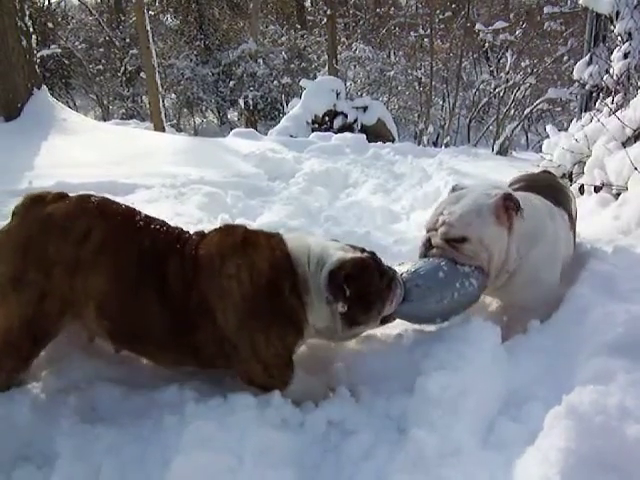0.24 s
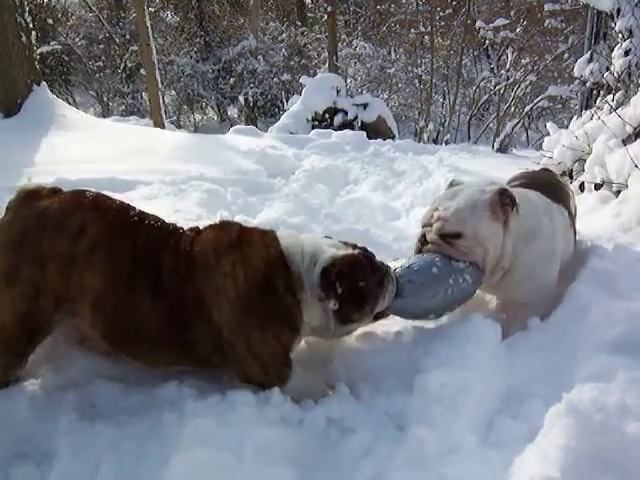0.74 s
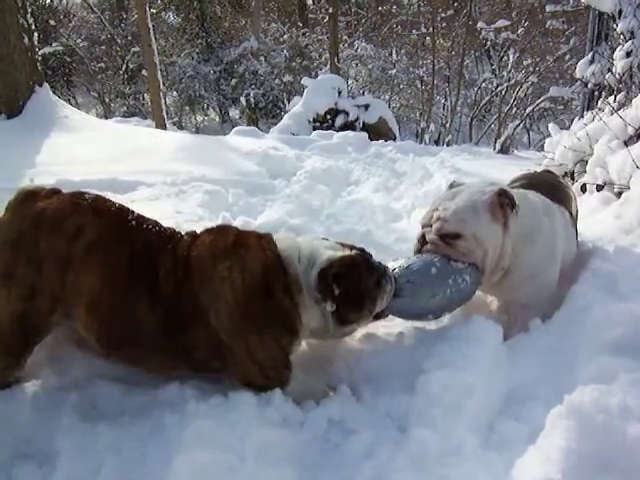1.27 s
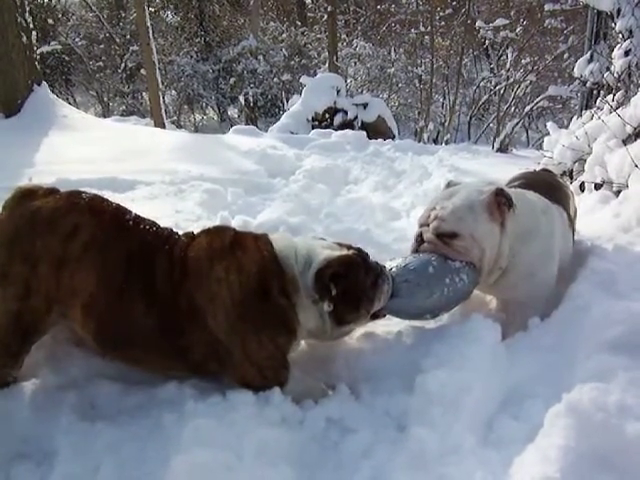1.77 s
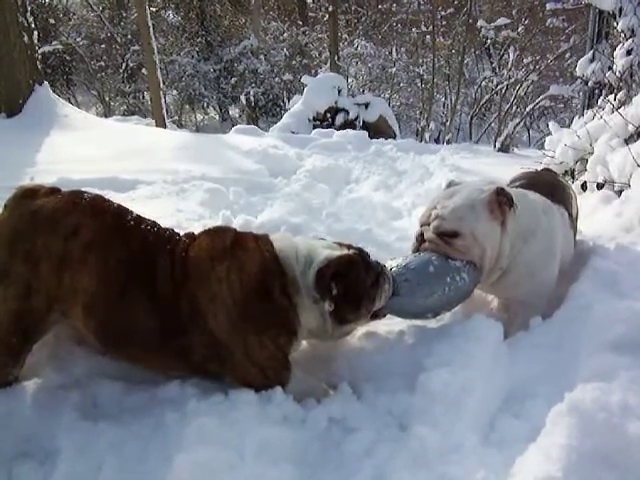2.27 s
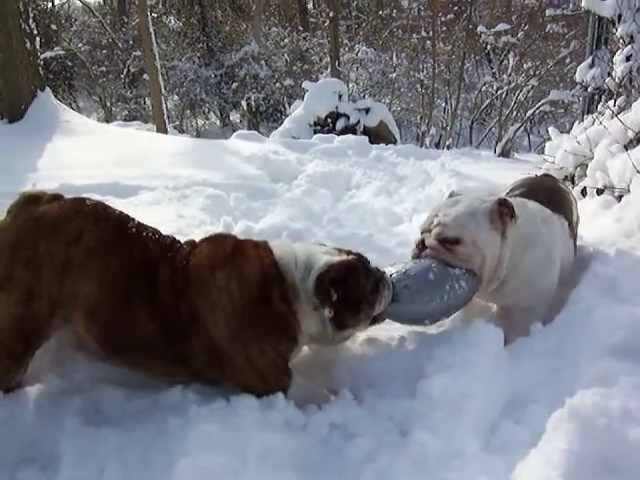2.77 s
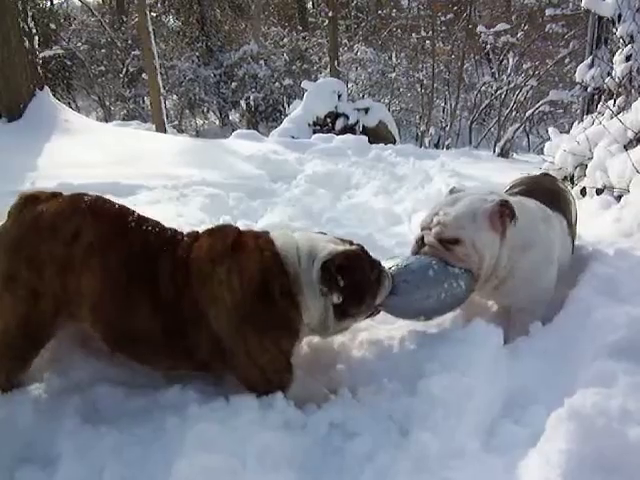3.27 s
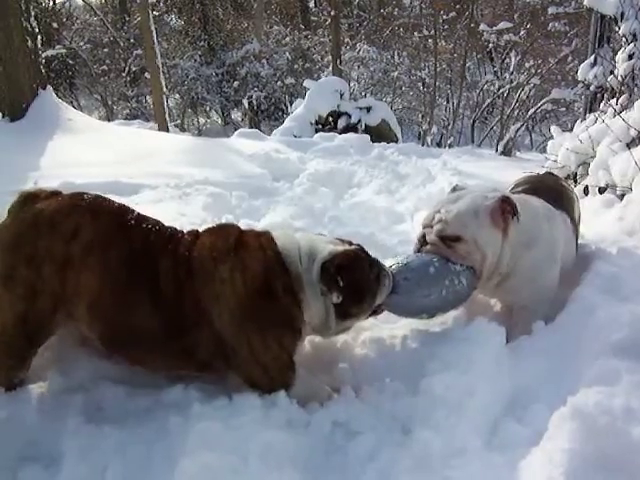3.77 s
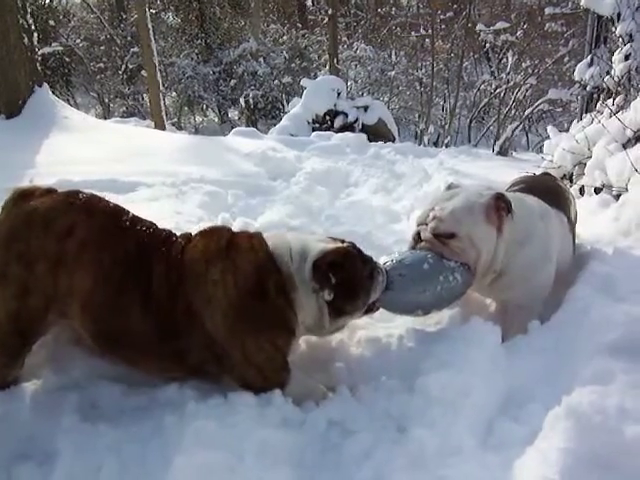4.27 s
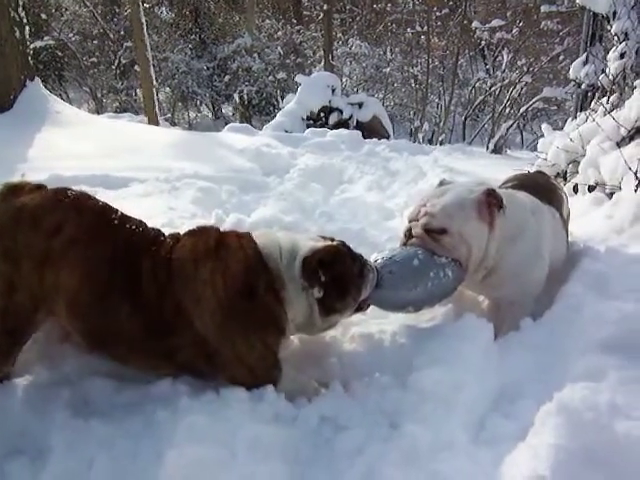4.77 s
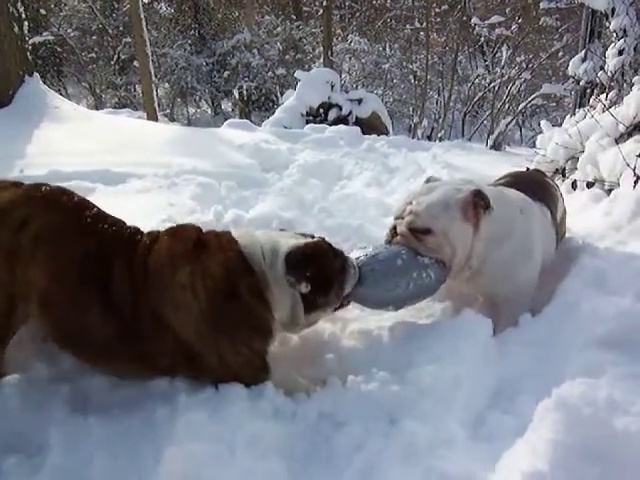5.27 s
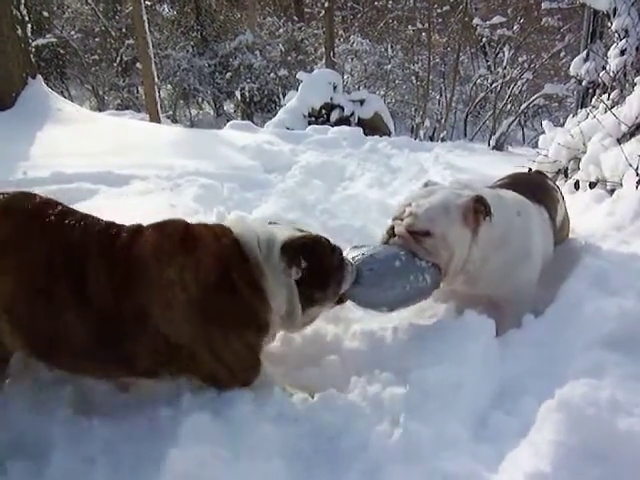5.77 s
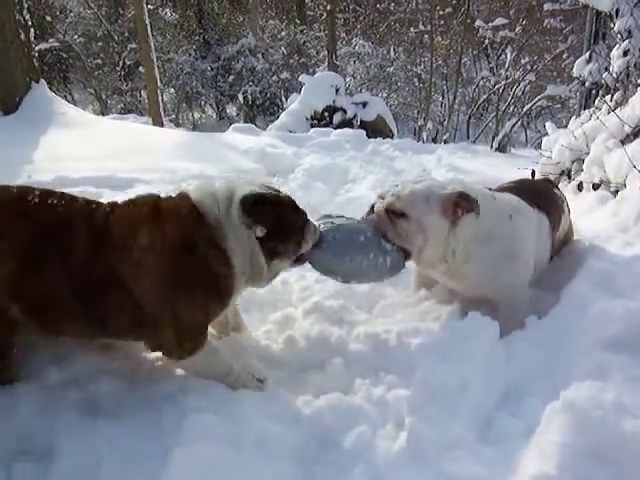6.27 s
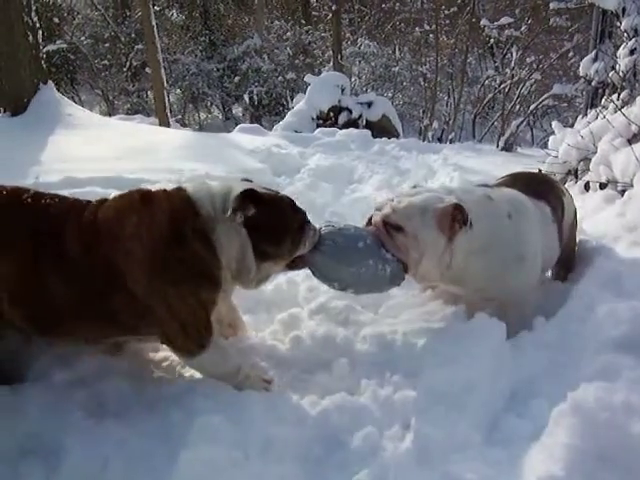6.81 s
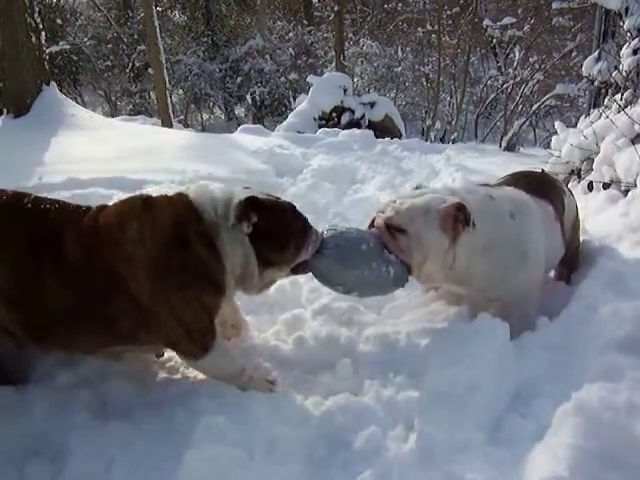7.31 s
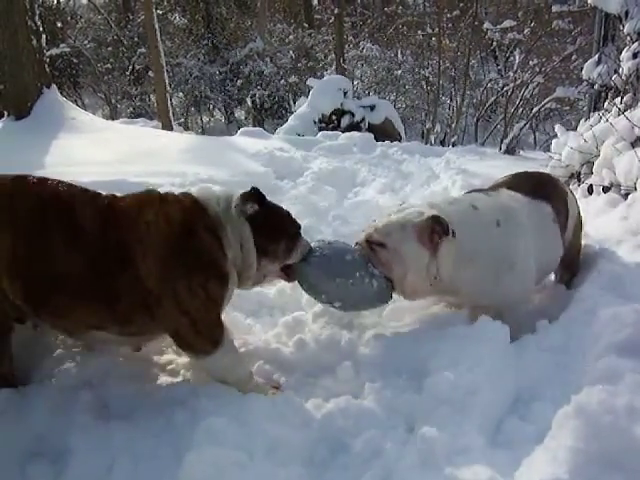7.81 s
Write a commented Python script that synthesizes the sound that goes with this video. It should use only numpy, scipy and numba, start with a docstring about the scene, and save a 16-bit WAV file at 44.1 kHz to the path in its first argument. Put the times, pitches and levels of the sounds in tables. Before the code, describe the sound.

Two short-nosed dogs tug with mouths full, their throaty growls fluttering about twenty times a second. The deep one builds to a hard bark, the background thins, and the higher one answers with a weak whine. Another deep growl breaks into a slightly softer bark, followed by higher, agitated growling, snorts and tooth knocks. Wind buffets a small, muffled microphone in an open snowy place with almost no echo.

```python
"""Two short-nosed dogs growl through clenched jaws as they tug a ball in deep snow, with two barks and a few snorts.
Each growl is a rough low voice chopped by a flapping soft palate and coloured by throat, mouth and nose.
Barks and snorts are fast uneven pulses through open jaws; a whine and nostril wheezes ride along.
Teeth click on the ball, a bird chirps, and wind rumbles and thumps on the microphone over a soft hiss."""
import sys
import numpy as np
from scipy import signal
from scipy.fft import rfft, irfft, next_fast_len
from scipy.io import wavfile
from scipy.ndimage import uniform_filter1d
from numba import njit

SR = 44100
rng = np.random.default_rng(int(sys.argv[2]) if len(sys.argv) > 2 else 0)


def store_pcm(level_fs):
    """Save levels as 16-bit WAV."""
    pcm = np.round(np.clip(level_fs, -1, 1) * 32767).astype(np.int16)
    wavfile.write(sys.argv[1], SR, np.atleast_2d(pcm).T)


N = 355001


def deep_dog(flap_db):
    """Long growls of the deep-voiced dog, its airway a set of throat, mouth and nose resonances."""
    # One list for each growl. Each row: time in seconds, pitch in Hz, effort in dB,
    # rasp over the effort in dB, mouth resonance in Hz.
    phrases = [
        [(0.0, 123.2, -37, -3, 1877), (0.05, 120.5, -40, -5.5, 1760), (0.14, 102.6, -38.5, 4, 1940),
         (0.315, 95.4, -41.5, 9, 2040), (0.335, 93.3, -44.5, 0, 2060), (0.38, 92.8, -50, 2.5, 2050),
         (0.4, 92.7, -62, -12, 2020), (0.55, 90.1, -57, -7, 1910)],
        [(1.04, 120, -56.5, -2.5, 1874), (1.23, 148.9, -53.5, -10.5, 1860), (1.52, 156.2, -48.5, -8, 2020),
         (1.71, 132.1, -45.5, -7.5, 2130), (1.95, 127.1, -44, -8, 2173), (2.28, 119, -37.5, -7.5, 1794),
         (2.69, 127.1, -34.5, -8.5, 1866), (2.845, 167.6, -27, -9.5, 1850)],
        [(3.74, 133, -62.5, -4, 1687), (3.85, 123, -55, -7.5, 1716), (4.13, 114.1, -54.5, -4, 1750),
         (4.62, 114.4, -46.5, -1, 2007), (4.74, 142.5, -43, -13, 2026), (4.815, 156, -43.5, -2, 1904)],
        [(7.27, 121.8, -60, -15, 1860), (7.49, 132.7, -50, -1.5, 1820), (7.6, 132.6, -52, 2, 1770),
         (7.71, 133, -44.5, -8.5, 1697), (7.79, 129.1, -45.5, 1, 1581), (7.96, 192.3, -44.5, 3, 1340),
         (8.05, 204.5, -40, 0.5, 1670)],
    ]
    # Body of each growl at mean effort. Each row: chest tone in dB, nose hiss in dB.
    placing = [(-36.5, -46.5), (-35, -48), (-42, -48.5), (-39, -47.5)]
    # Fixed throat resonances. Each row: centre in Hz, width in Hz, level in dB.
    throat = [(506, 292, 13.5), (912, 140, 7), (1056, 93, 12)]
    # Mouth resonances that move. Each row: centre as a multiple of the mouth Hz, width in Hz, level in dB.
    mouth = [(1.02, 233, 6.5), (0.93, 580, 2), (1.299, 97.8, 0.92)]
    # Fixed nose resonances. Each row: centre in Hz, width in Hz, level in dB.
    nose = [(3160, 700, -4.5), (3905, 310, -5), (5140, 2100, -13.5), (5860, 470, -5.5), (6840, 7200, -9)]
    return growl(phrases, placing, throat, mouth, nose, flap_db,
                 chest_law=(0.72, .3, -37.5), hiss_law=(0.87, 0.92, -20),
                 jitter=.08, breath=0.85, rattle=1.24, overtone=0.11)


def higher_dog(flap_db):
    """Growls of the higher-voiced dog: a steadier, less breathy voice with more rattle and octave in the chest."""
    # One list for each growl. Each row: time in seconds, pitch in Hz, effort in dB,
    # rasp over the effort in dB, mouth resonance in Hz.
    phrases = [
        [(3.01, 170.3, -45, -10, 2000), (3.31, 191.6, -54.5, -8, 2080), (3.44, 169.4, -54.5, -10.5, 2170),
         (3.57, 177, -59.5, -4, 2357)],
        [(5.02, 170.5, -61.5, -10, 2000), (5.16, 161.6, -55, -4.5, 1920), (5.34, 147, -61.5, -7.5, 2300),
         (5.52, 174.4, -54, -9.5, 2402), (5.72, 173, -59, -4.5, 2495), (5.8, 167.5, -52, -5, 2000),
         (5.92, 163.7, -47, -10.5, 1772), (6.04, 185.4, -51, -3.5, 2300)],
        [(6.06, 214.9, -54, -2, 2120), (6.13, 232.2, -46.5, -7.5, 2140), (6.28, 199.4, -49, -7.5, 2312),
         (6.43, 268.7, -40.5, -10, 1950), (6.46, 191.7, -39.5, -8.5, 1980), (6.56, 186, -42, 2, 2020),
         (6.68, 191.3, -50.5, -9, 2250), (6.75, 205, -59.5, 3.5, 2230)],
    ]
    # Body of each growl at mean effort. Each row: chest tone in dB, nose hiss in dB.
    placing = [(-49, -48.5), (-45.5, -49.5), (-44.5, -50)]
    # Fixed throat resonances. Each row: centre in Hz, width in Hz, level in dB.
    throat = [(496, 196, 7.8), (978, 286, 3.9)]
    # Mouth resonances that move. Each row: centre as a multiple of the mouth Hz, width in Hz, level in dB.
    mouth = [(.82, 405, -5), (1, 363, 5.5), (1.2, 350, -7)]
    # Fixed nose resonances. Each row: centre in Hz, width in Hz, level in dB.
    nose = [(3590, 760, 1), (4950, 200, -9), (6050, 1630, -5)]
    return growl(phrases, placing, throat, mouth, nose, flap_db,
                 chest_law=(0.4, 0.086, -35), hiss_law=(0.8, 0.75, -20),
                 jitter=.05, breath=0.75, rattle=1.7, overtone=0.31)


def growl(phrases, placing, throat, mouth, nose, flap_db, chest_law, hiss_law, jitter, breath, rattle, overtone):
    """Chest tone, then throat, mouth and nose resonances of a breathy voice chopped by the palate."""
    spans = [[(*row, *pair) for row in rows] for rows, pair in zip(phrases, placing)]
    gate, hz, effort_db, rasp_db, mouth_hz, chest_mean_db, nose_mean_db = in_time(spans)
    chest_db = follow_effort(chest_mean_db, effort_db, rasp_db, *chest_law)
    nose_db = follow_effort(nose_mean_db, effort_db, rasp_db, *hiss_law)

    phase, source = glottis(hz, jitter, shimmer_db=5.5, breath=breath)
    chopped = source * from_db(flap_db)
    gusts = from_db(1.4 * flap_db + 1.5 * drift(9))
    airy = (source + 0.38 * rng.standard_normal(N)) * gusts   # turbulence in the nose

    tone = np.sin(2 * np.pi * phase) + overtone * np.sin(4 * np.pi * phase)
    hum = rms_one(tone * from_db(.4 * flap_db + 2.5 * drift(40)))
    rattling = rms_one(moving_resonance(chopped, 0.74 * hz, width_hz=78.7))   # just below the pitch
    chest = rms_one(hum + rattle * rattling)

    clenched = chopped * from_db(0.2 * flap_db)   # the mouth is chopped a little deeper
    jaws = rms_one(sum(from_db(level_db) * moving_resonance(clenched, ratio * mouth_hz, width_hz)
                       for ratio, width_hz, level_db in mouth))
    voice = from_db(chest_db) * chest + from_db(effort_db) * resonances(chopped, throat)
    voice = voice + from_db(effort_db + rasp_db) * jaws
    return gate * (voice + from_db(nose_db) * resonances(airy, nose))


def follow_effort(mean_db, effort_db, rasp_db, effort_share, rasp_share, top_db):
    """Level that follows a share of effort and rasp; effort above top_db adds no more."""
    mean_effort_db = -45
    return mean_db + effort_share * (np.minimum(effort_db, top_db) - mean_effort_db) + rasp_share * rasp_db


def palate():
    """The soft palate snaps open and shut a little unevenly, in some bouts fast at first; level change in dB."""
    # Bouts of flapping. Each row: first flap in seconds, settled flaps per second,
    # extra flaps per second at the start, swing either way in dB before each source scales it.
    bouts = np.array([(.014, 21.6, 0, 2.5), (1.031, 21.8, 5.3, 3), (3.025, 22.8, 0, 2.3),
                      (3.771, 23.6, 0, 2.3), (5.026, 24, 0, 2.8), (6.055, 16.5, 10.2, 2.2),
                      (7.299, 20.5, 5, 3.8), (7.805, 21.5, 0, 1.8)])
    settle_s = .5
    t = np.arange(N) / SR
    current = np.maximum(np.searchsorted(bouts[:, 0], t) - 1, 0)
    first, rate, extra, depth_db = bouts[current].T
    flaps = rate * (t - first) + extra * settle_s * (1 - np.exp((first - t) / settle_s))
    swing = np.cos(2 * np.pi * (flaps + .06 * drift(12))) + .3 * drift(25)
    return depth_db * np.tanh(2.2 * (swing - .15))   # squared off, shut longer than open


def glottis(hz, jitter, shimmer_db, breath):
    """Vocal folds: the phase of an uneven cycle, and a pulse plus a puff of air at each closing."""
    phase = np.cumsum(hz * np.exp(jitter * drift(60))) / SR
    closing = np.diff(np.floor(phase), prepend=0)
    pulses = rms_one(closing * from_db(shimmer_db * rng.standard_normal(N)))
    puffs = rms_one(rng.standard_normal(N) * np.exp(-1.2 * (phase % 1)))
    breath = np.clip(breath, 0, 1)
    return phase, np.sqrt(1 - breath) * pulses + np.sqrt(breath) * puffs


def barks():
    """Forced air: fast, uneven pulses through the open mouth, bunched by a slower flutter of the folds."""
    # Barks and snorts with open jaws. Each row: start in seconds, attack in seconds, hold in seconds,
    # release in seconds, peak level in dB, low share in dB, top share in dB.
    calls = [(2.842, 0.023, 0.093, 0.065, -16.5, -1, -9), (3.567, 0.034, 0.022, 0.044, -60, 1, 7),
             (4.816, 0.045, 0.091, 0.053, -21, -1, -9.5), (6.034, 0.025, 0.0059, 0.075, -31.5, -12, -9.5),
             (6.768, .03, 0.033, 0.037, -63.5, 3, 3), (7.75, 0.018, .04, .008, -46.5, 1, 6),
             (7.807, .036, 0.0048, 0.022, -31.5, -3.5, -11.5)]
    # Low resonances. Each row: centre in Hz, width in Hz, level in dB.
    low = [(177, 43, -3), (540, 690, -2), (901, 550, 2.5)]
    # Middle resonances. Each row: centre in Hz, width in Hz, level in dB.
    middle = [(1580, 930, 5.5), (2090, 760, 4.5), (2620, 84, 1.5)]
    # Top resonances. Each row: centre in Hz, width in Hz, level in dB.
    top = [(3730, 580, -0.5), (4810, 250, -9), (5680, 1070, -6.5)]
    pulses_per_s, flutters_per_s = 280, 90
    gate, level_db, low_db, top_db = in_time([bark_shape(*row) for row in calls])
    _, source = glottis(pulses_per_s, jitter=.3, shimmer_db=3.0, breath=.5)
    flutter = np.cumsum(flutters_per_s * np.exp(.1 * drift(30))) / SR % 1
    source = source * np.exp(-1.2 * flutter)
    colour = resonances(source, middle) + from_db(low_db) * resonances(source, low)
    hissing = source + 0.4 * rng.standard_normal(N)   # air past the teeth
    return gate * from_db(level_db) * (colour + from_db(top_db) * resonances(hissing, top))


def bark_shape(s, attack, hold, release, peak_db, low_db, top_db):
    """Attack, sagging and dulling hold, release: rows of (s, level dB, low share dB, top share dB)."""
    rise_db, fall_db = 25.5, 26.5
    sag_db_per_s, dulling_db_per_s = 60, 92
    edge_low_db, edge_top_db = 10, 9   # jaws nearly shut at both ends
    held_db = peak_db - sag_db_per_s * hold
    dull_db = top_db - dulling_db_per_s * hold
    return [(s, peak_db - rise_db, low_db + edge_low_db, top_db + edge_top_db),
            (s + attack, peak_db, low_db, top_db),
            (s + attack + hold, held_db, low_db - 7.0, dull_db),
            (s + attack + hold + release, held_db - fall_db, low_db + edge_low_db, dull_db + edge_top_db)]


def whine(flap_db):
    """A clear, slightly unsteady tone over the higher growl, with weaker partials at 1.5 and 2 times its pitch."""
    # Whines that arch up and partly back. Each row: start in seconds, length in seconds, pitch in Hz,
    # arch in Hz, level in dB.
    arches = [(3.111, 0.39, 530, 34.9, -57.5), (5.794, 0.25, 489.6, 74.4, -50.5),
              (6.312, .42, 449.3, 150, -45.5)]
    attack_s, release_s, fade_db = 0.035, 0.0586, 25
    spans = [[(s, hz, db - fade_db),
              (s + attack_s, hz + .2 * arch_hz, db),
              (s + length / 2, hz + arch_hz, db),
              (s + length - release_s, hz + .6 * arch_hz, db),
              (s + length, hz + 0.24 * arch_hz, db - fade_db)]
             for s, length, hz, arch_hz, db in arches]
    gate, hz, level_db = in_time(spans)
    turn = 2 * np.pi * np.cumsum(hz * np.exp(.035 * drift(40))) / SR
    tone = np.sin(turn) + .3 * np.sin(1.5 * turn) + .35 * np.sin(2 * turn)
    return gate * from_db(level_db) * rms_one(tone * from_db(.6 * flap_db))


def wheeze(flap_db):
    """Air squeezed through a narrow nostril: ringing turbulence, chopped with the growl."""
    # Each row: start in seconds, length in seconds, centre in Hz, glide in Hz, level in dB, swell in dB.
    breaths = [(2.08, .77, 5234, -100, -50.5, 3), (3.75, 1.07, 5100, 241.5, -60.5, 3.5),
               (7.87, .18, 5870, 55.5, -45, 0.5)]
    attack_s, fade_db = .05, 25
    spans = [[(s, hz, db - fade_db), (s + attack_s, hz, db), (s + length, hz + glide_hz, db + swell_db)]
             for s, length, hz, glide_hz, db, swell_db in breaths]
    gate, hz, level_db = in_time(spans)
    air = rng.standard_normal(N) * from_db(1.9 * flap_db)
    return gate * from_db(level_db) * rms_one(moving_resonance(air, hz, width_hz=330))


def teeth_clicks():
    """Teeth slipping on the ball: short rings that last several cycles."""
    # Each row: time in seconds, starting level in dB, ring in Hz.
    slips = [(3.217, -48.5, 834), (5.785, -47, 853.3), (5.81, -40, 959), (5.852, -46, 666),
             (6.58, -48, 594.5), (6.611, -27.5, 574), (6.773, -37.5, 793.5), (7.466, -34.5, 1243)]
    return knocks(slips, cycles=4.6)


def microphone_thumps():
    """Dull thumps on the microphone, gone within about a cycle."""
    # Each row: time in seconds, starting level in dB, pitch in Hz.
    bumps = [(0.633, -17.5, 121), (1.088, -14, 69.85), (3.468, -33, 21.2), (7.01, -26, 26.7)]
    return knocks(bumps, cycles=0.26)


def knocks(events, cycles):
    """Each knock is a sine whose envelope falls by a factor e in the given number of cycles."""
    out = np.zeros(N)
    for s, start_db, hz in events:
        at = round(s * SR)
        turns = hz * np.arange(min(N - at, SR // 4)) / SR
        out[at:at + len(turns)] += from_db(start_db) * np.sin(2 * np.pi * turns) * np.exp(-turns / cycles)
    return out


def bird():
    """A wavering whistle, blurred by two echoes from the trees."""
    # Each row: start in seconds, length in seconds, top pitch in Hz, level in dB,
    # share of the tune skipped from 0 to 1.
    chirps = [(0.397, .124, 4990, -50, 0.07), (1.806, 0.11, 5007, -49.5, 0.01),
              (5.32, 0.14, 4800, -67, 0.4)]
    # Tune of one chirp. Each row: time as a share of length, pitch as a share of the top, level in dB.
    tune = [(0, .85, -10), (.12, 1, -2), (.32, .75, 0), (.48, .63, -2), (.72, .8, 0), (.82, .7, -2),
            (1, .66, -9)]
    spans = [[(s + at * length, ratio * top_hz, db + level_db) for at, ratio, db in tune if at >= skipped]
             for s, length, top_hz, level_db, skipped in chirps]
    gate, hz, level_db = in_time(spans)
    whistle = np.sin(2 * np.pi * np.cumsum(hz * (1 + .015 * drift(300))) / SR)
    direct = np.sqrt(2) * gate * from_db(level_db + 2.5 * drift(80)) * whistle   # sqrt(2): levels are rms
    first_echo = .4 * np.roll(direct, round(.007 * SR))
    second_echo = .3 * np.roll(direct, round(.016 * SR))
    return direct + first_echo + second_echo


def wind_and_air():
    """Lumpy rumble on the microphone under a smooth hiss; both thin out after the first bark and later return."""
    # Background levels. Each row: time in seconds, rumble in dB before its lumps, hiss in dB.
    levels = [(0, -32, -54), (.4, -34, -52.5), (.74, -41, -52), (2.87, -36.5, -64.5), (3.05, -54.5, -69),
              (3.6, -49.5, -66), (3.85, -58, -69), (4.8, -48.5, -52), (5.3, -54.5, -66.5),
              (5.95, -43.5, -69), (6.3, -47, -65), (7.1, -51, -60.5), (8.05, -38, -63)]
    # Rumble spectrum. Each row: frequency in Hz, relative level in dB per Hz.
    rumble_spectrum = [(15, -24), (25, -0.5), (48, -9), (60, -1.5), (72, -4), (100, -4), (200, -21),
                       (400, -23.5), (800, -39), (1500, -43)]
    # Hiss spectrum. Each row: frequency in Hz, relative level in dB per Hz.
    hiss_spectrum = [(150, -23), (400, -12), (900, -7.5), (2000, -11.5), (4000, -18.5), (7000, -21),
                     (8500, -14)]
    lumps = from_db(2.5 * drift(12))
    _, rumble_db, hiss_db = in_time([levels])
    rumble = from_db(rumble_db) * lumps * coloured_noise(rumble_spectrum)
    return rumble + from_db(hiss_db) * coloured_noise(hiss_spectrum)


def coloured_noise(spectrum):
    """Noise shaped by a (Hz, dB per Hz) table; rms 1."""
    hz, level_db = np.transpose(spectrum)
    size = next_fast_len(N)
    grid = np.log(np.fft.rfftfreq(size, 1 / SR) + 1)
    shape = from_db(np.interp(grid, np.log(hz), level_db))
    return rms_one(irfft(rfft(rng.standard_normal(size)) * shape, size)[:N])


def resonances(x, modes):
    """Parallel resonances of alternating sign, each passed twice for dark valleys; rms 1."""
    out = 0
    for k, (hz, width_hz, level_db) in enumerate(modes):
        r = np.exp(-np.pi * 1.5 * width_hz / SR)   # wider, since two passes narrow it
        stage = [(1 - r * r) / 2, 0, (r * r - 1) / 2, 1, -2 * r * np.cos(2 * np.pi * hz / SR), r * r]
        out = out + (-1) ** k * from_db(level_db) * signal.sosfilt([stage, stage], x)
    return rms_one(out)


@njit
def glide(x, pull, r):
    """A two-pole resonance whose centre moves."""
    out = np.zeros(len(x))
    for i in range(2, len(x)):
        out[i] = x[i] - x[i - 2] + pull[i] * out[i - 1] - r * r * out[i - 2]
    return out


def moving_resonance(x, hz, width_hz):
    """A gliding resonance passed twice for dark valleys; gain 1 on top."""
    r = np.exp(-np.pi * 1.5 * width_hz / SR)   # wider, since two passes narrow it
    pull = 2 * r * np.cos(2 * np.pi * hz / SR)
    return ((1 - r * r) / 2) ** 2 * glide(glide(x, pull, r), pull, r)


def drift(rate):
    """Slow random wander of spread 1, drawn at every 16th sample; rate in Hz."""
    r = np.exp(-32 * np.pi * rate / SR)
    draws = rng.standard_normal(N // 16 + 3002)
    slow = signal.lfilter([1], [1, -2 * r, r * r], draws)[3000:]   # skip the filter's start
    return np.interp(np.arange(N) / 16, np.arange(len(slow)), rms_one(slow))


def in_time(tables):
    """Columns of several spans as signals, led by a soft-edged gate that is open inside the spans."""
    t = np.arange(N) / SR
    s, *columns = np.concatenate(tables).T
    gate = sum((t >= rows[0][0]) & (t <= rows[-1][0]) for rows in tables)
    return [uniform_filter1d(gate * 1., size=600)] + [np.interp(t, s, c) for c in columns]


def from_db(db):
    """Gain of a level in dB."""
    return np.exp(np.asarray(db) * (np.log(10) / 20))


def rms_one(x):
    """Scaled to unit power."""
    return x / np.sqrt(np.mean(x ** 2) + 1e-20)


def scene():
    """Dogs, ball, bird and wind in one channel; snow swallows the echoes, so only the bird has any."""
    flap_db = palate()   # both dogs, the wheeze and the whine share the flapping
    dogs = deep_dog(flap_db) + wheeze(flap_db) + higher_dog(flap_db) + whine(flap_db) + barks()
    small = bird() + teeth_clicks() + microphone_thumps()
    return (dogs + small + wind_and_air())[None]


def record(dry):
    """A small microphone rounds the peaks and rolls off the treble; the top is cut."""
    rolloff_hz, cutoff_hz = 8460, 9150
    rounded = .8 * np.tanh(dry / .8)
    dull = signal.sosfilt(signal.butter(3, rolloff_hz, fs=SR, output="sos"), rounded)
    return signal.sosfilt(signal.cheby2(12, 70, cutoff_hz, fs=SR, output="sos"), dull)   # 70 dB down from the cutoff


dry = scene()
out = record(dry)
store_pcm(out)
```